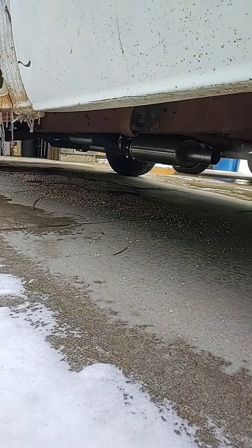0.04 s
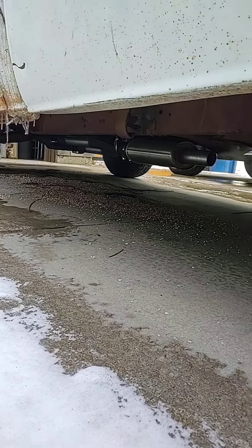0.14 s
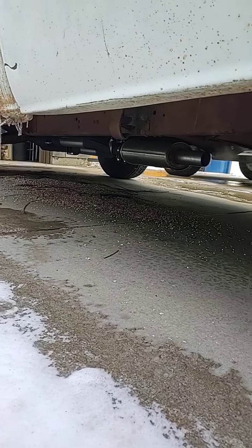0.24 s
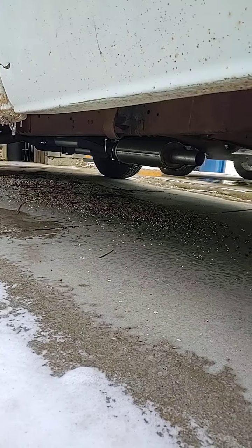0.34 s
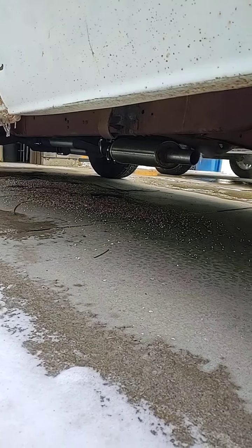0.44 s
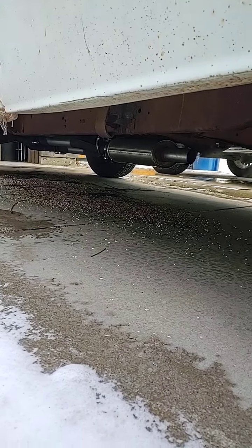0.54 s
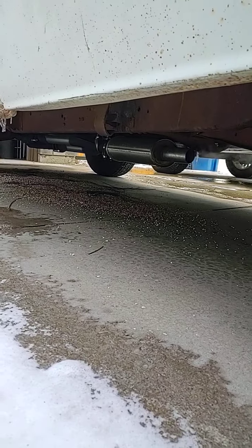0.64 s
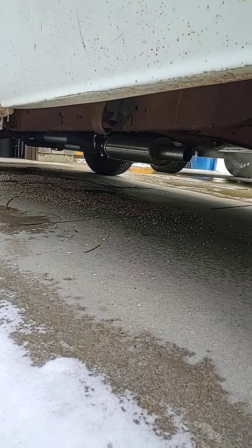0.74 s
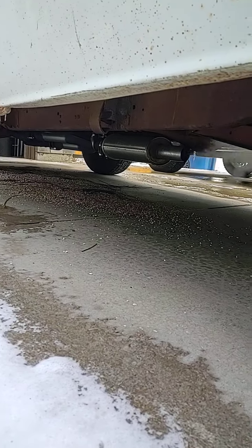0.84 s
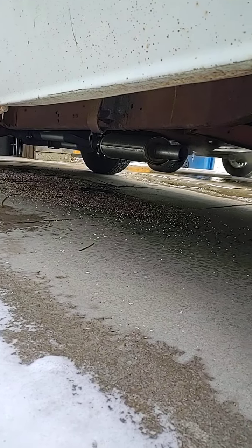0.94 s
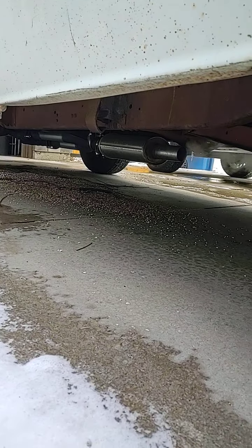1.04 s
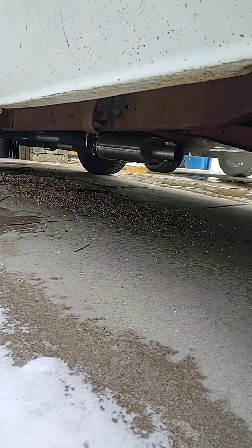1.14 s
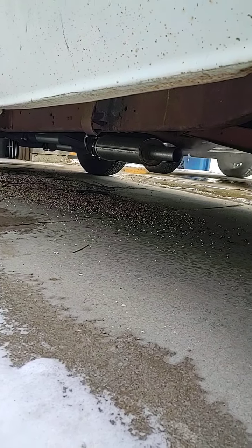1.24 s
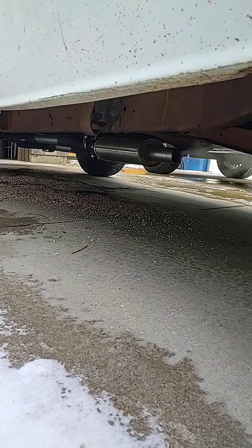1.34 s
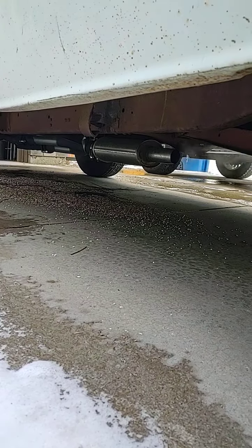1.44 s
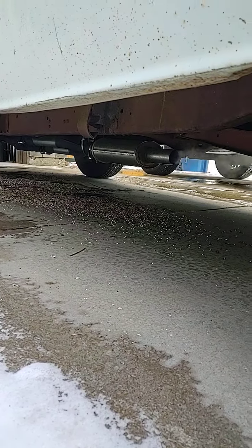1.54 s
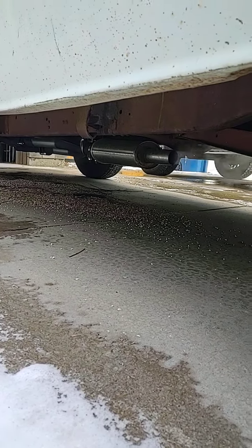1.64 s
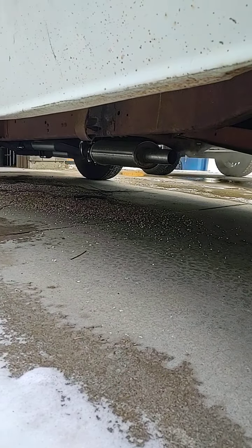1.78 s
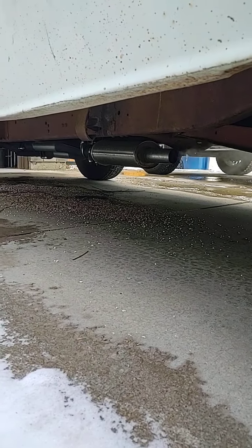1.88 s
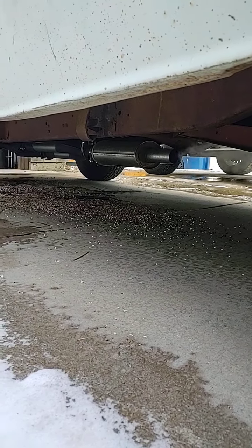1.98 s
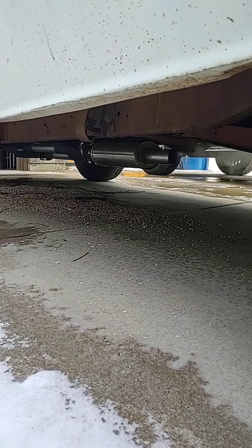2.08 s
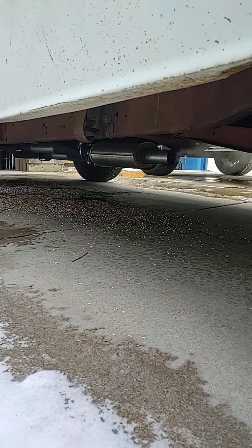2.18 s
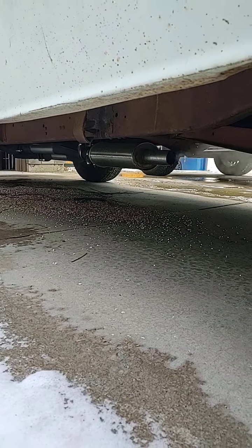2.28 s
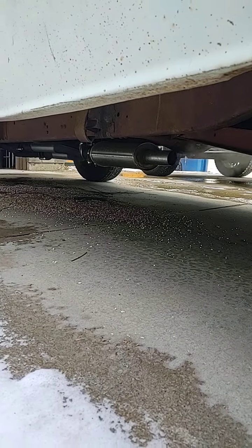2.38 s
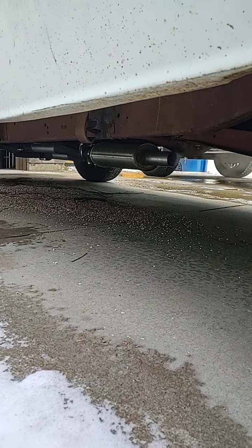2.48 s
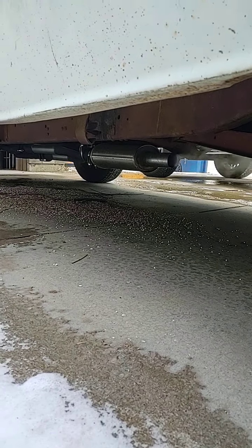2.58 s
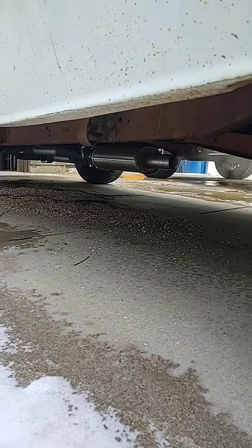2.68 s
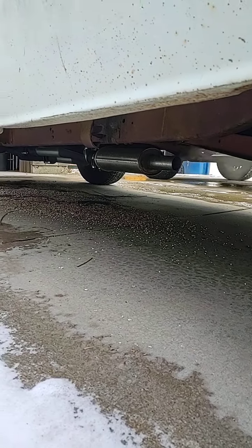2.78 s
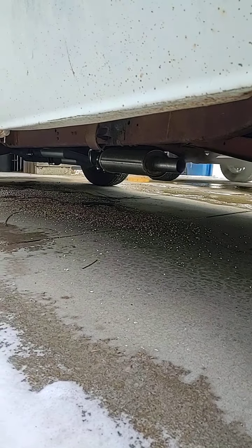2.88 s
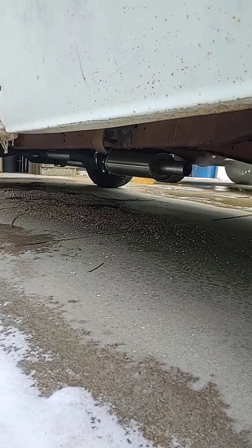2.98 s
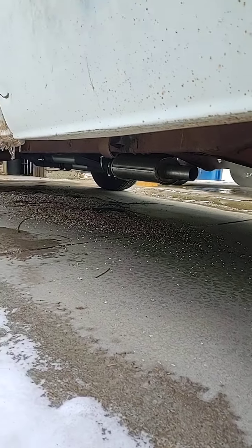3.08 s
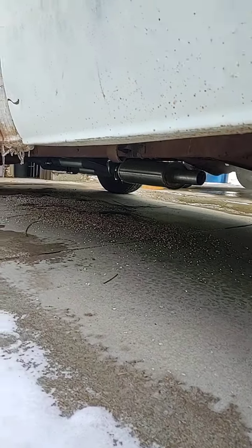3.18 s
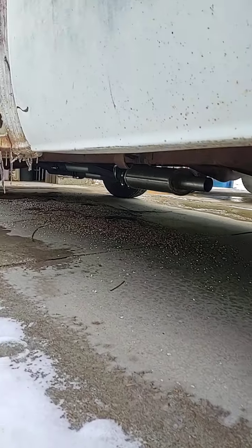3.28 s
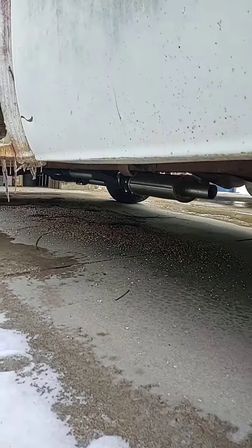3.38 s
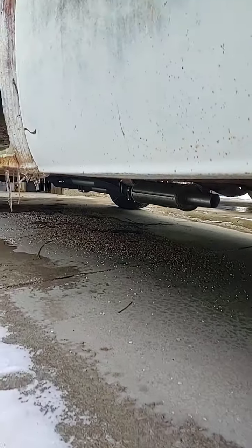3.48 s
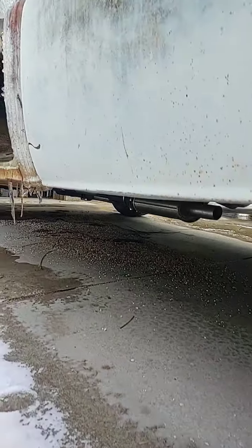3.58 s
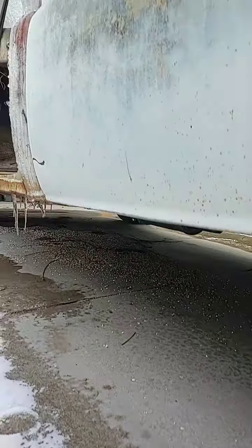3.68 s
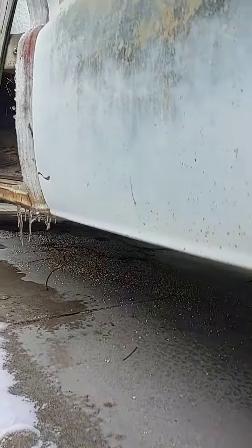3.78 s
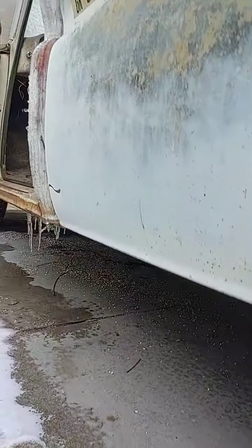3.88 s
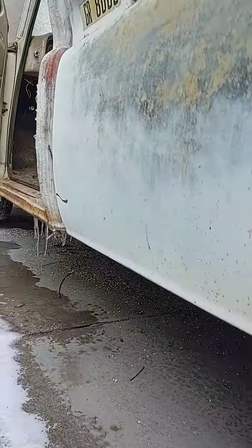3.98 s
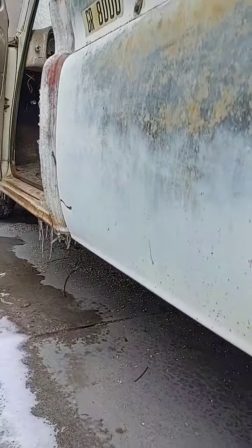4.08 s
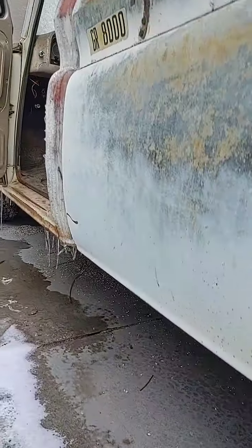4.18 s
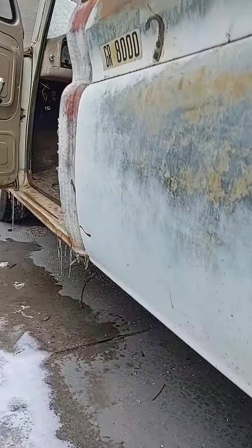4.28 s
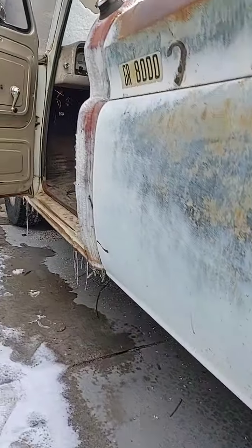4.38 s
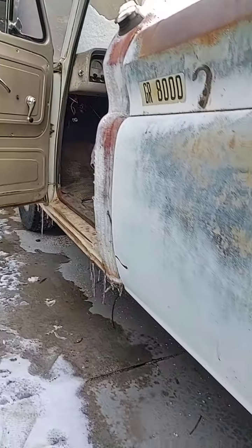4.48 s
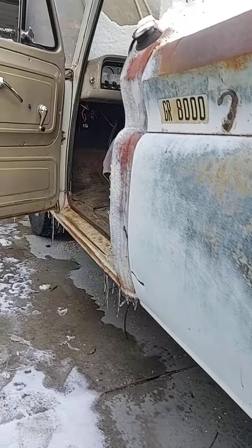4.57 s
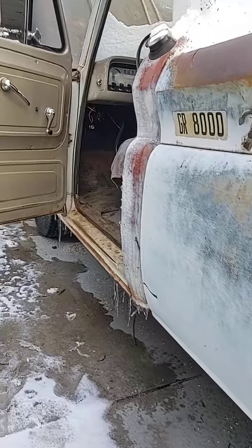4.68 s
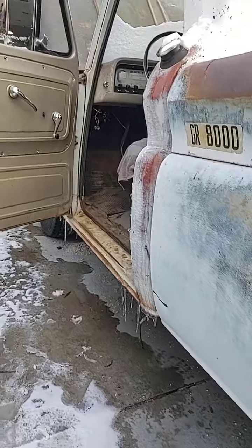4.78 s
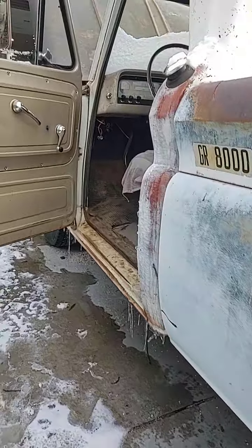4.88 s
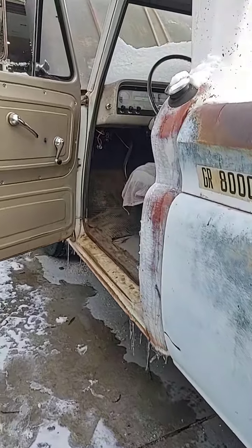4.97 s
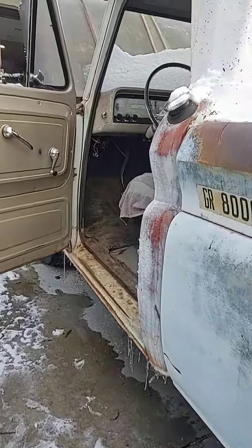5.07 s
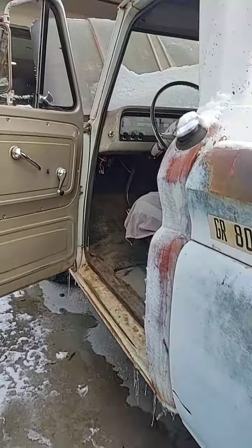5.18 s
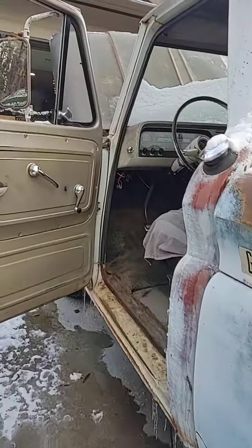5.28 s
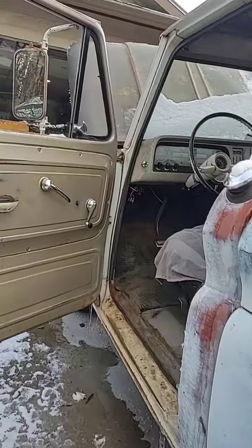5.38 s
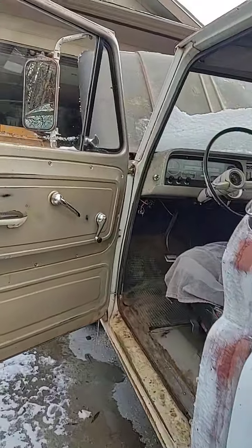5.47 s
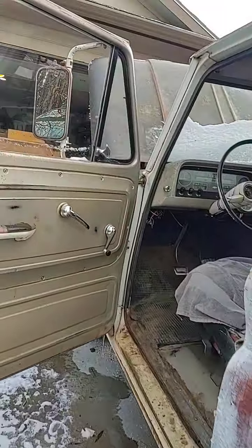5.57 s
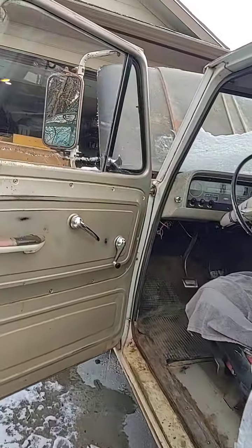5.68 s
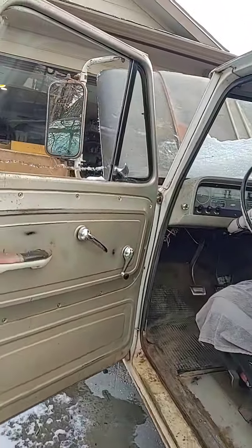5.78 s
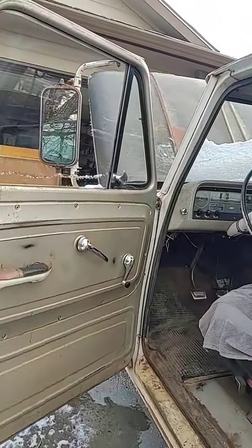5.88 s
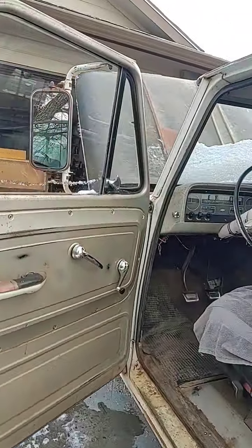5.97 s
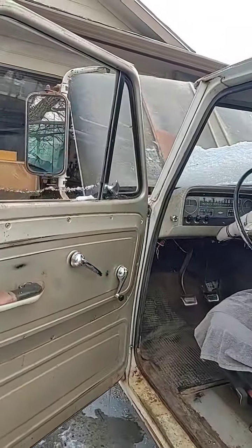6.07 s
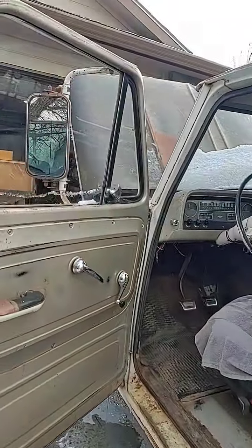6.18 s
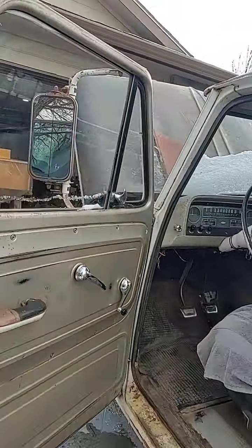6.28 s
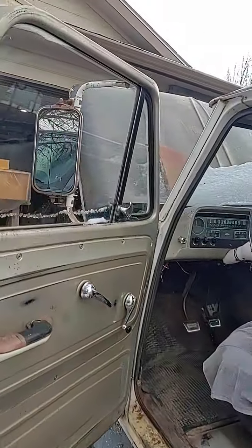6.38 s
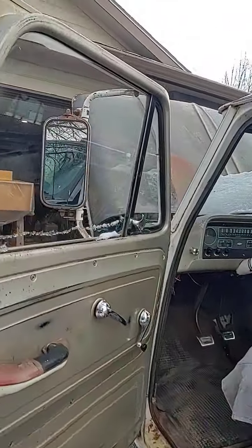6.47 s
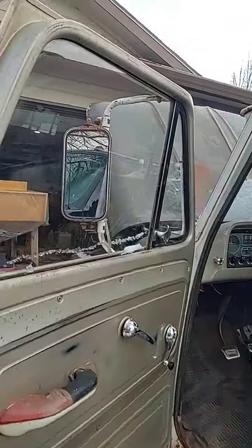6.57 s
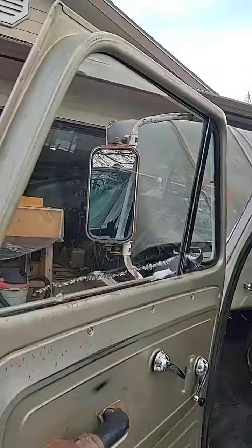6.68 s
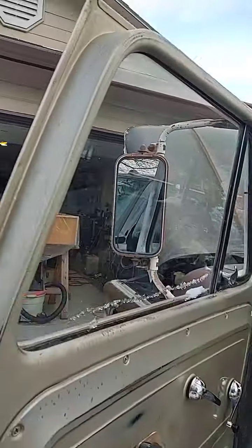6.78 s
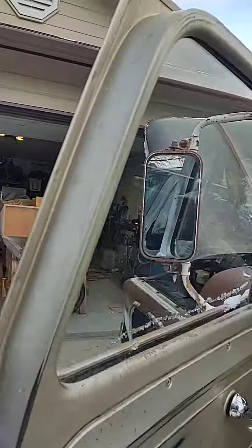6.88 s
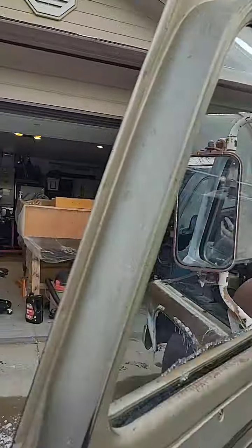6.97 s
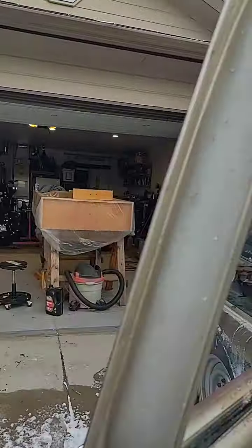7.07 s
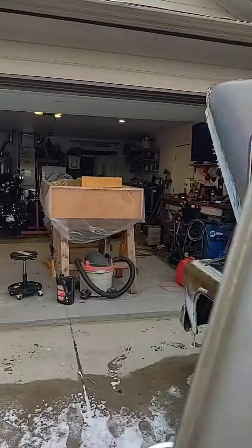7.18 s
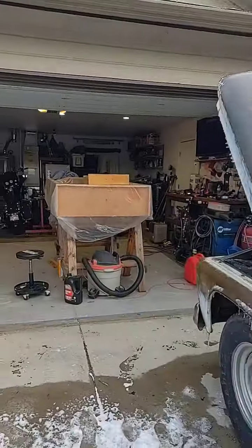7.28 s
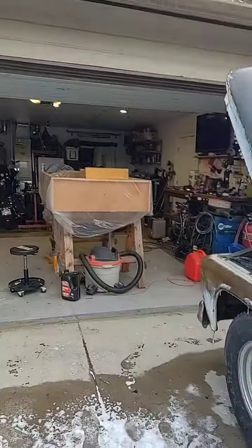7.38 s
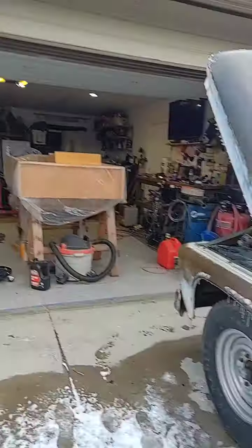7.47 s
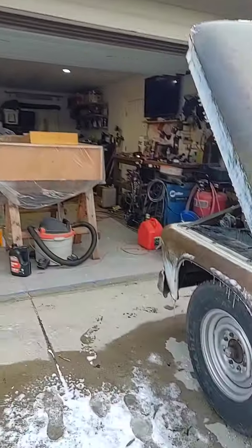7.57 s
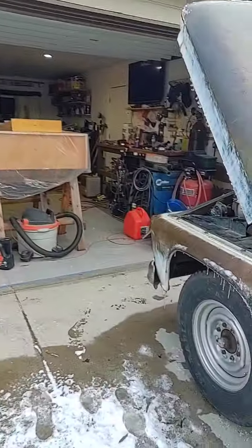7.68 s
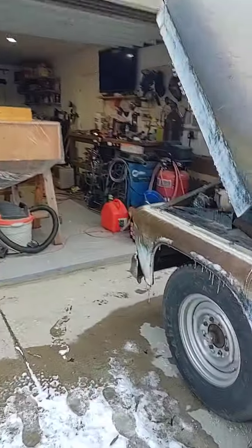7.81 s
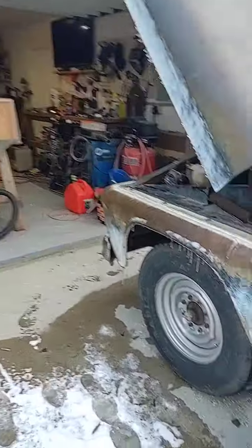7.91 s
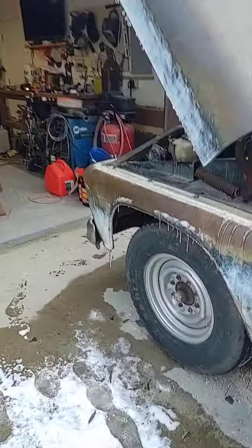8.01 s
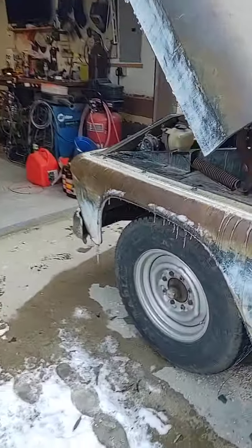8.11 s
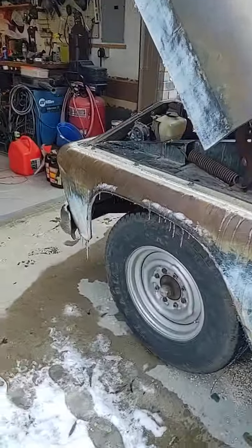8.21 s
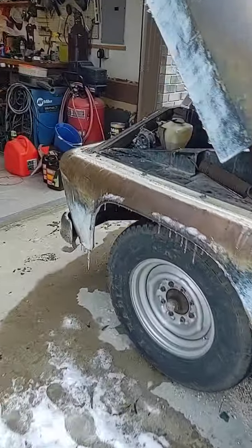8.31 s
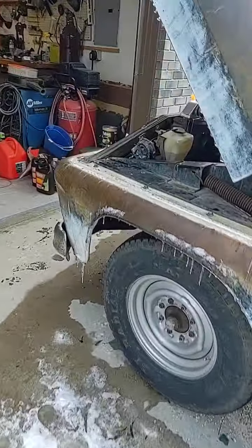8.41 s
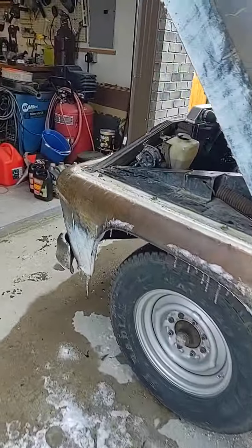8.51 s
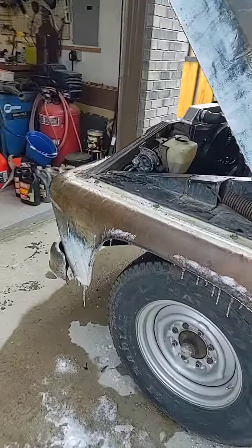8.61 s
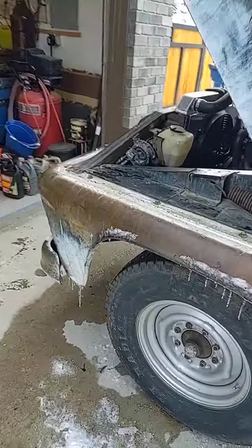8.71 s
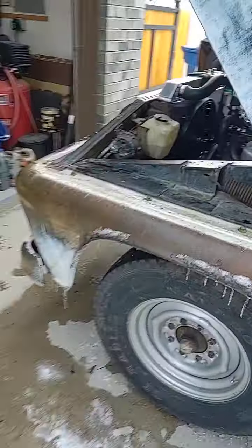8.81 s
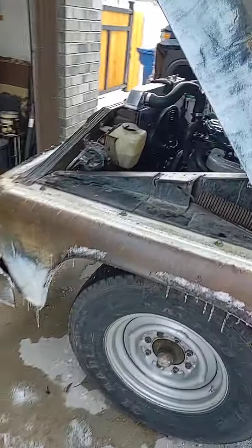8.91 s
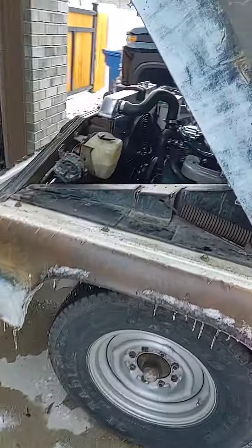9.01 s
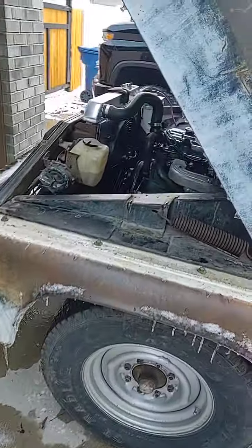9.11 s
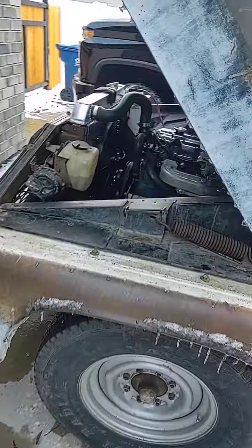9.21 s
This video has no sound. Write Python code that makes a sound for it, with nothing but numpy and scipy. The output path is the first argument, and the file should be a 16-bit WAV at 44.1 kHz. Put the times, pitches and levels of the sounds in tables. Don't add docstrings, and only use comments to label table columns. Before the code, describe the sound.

Rapid ragged exhaust chuffs from a rough six-cylinder idle recede behind the truck's body, giving way to deep throb, engine-bay hiss and airy intake whistle.

```python
import sys
import numpy as np
from scipy import signal
from scipy.fft import rfft, irfft, next_fast_len
from scipy.io import wavfile
from scipy.ndimage import uniform_filter1d, map_coordinates

SR = 44100
rng = np.random.default_rng(int(sys.argv[2]) if len(sys.argv) > 2 else 0)


def amp(db):
    return 10 ** (np.asarray(db, float) / 20)


def write(x):
    x = np.atleast_2d(x).T
    wavfile.write(sys.argv[1], SR, np.round(np.clip(x, -1, 1) * 32767).astype(np.int16))


N = 407925
FIRING_PERIOD_S = 0.051

# (time [s], firing rate [1/s])
IDLE_RATE = [
    (7.0, 16),
    (7.39, 19),
    (7.68, 22),
    (8.52, 20.3),
    (8.94, 21.0),
    (9.25, 16.6),
]
# (frequency [Hz], width [Hz], front over rear manifold [dB], lag [s])
PIPE_MODES = [(46, 24, -16, .030), (61, 22, 8, .001), (76, 28, 8, .039), (99, 20, 6, .01),
              (120, 28, -8, .02)]
# (rest level [dB], share of surge, share of stumble,
# loss with distance [dB/m], surge share gained with distance [1/m])
MODE_RESPONSE = [(-32, -0.75, 0.52, 5, 0.14), (-40, 1.02, 1.8, 4, -0.085), (-40, 0.2, -0.75, 3, 0.33),
                 (-41, -0.055, 0.2, 3, -0.0018), (-41.5, 0.7, 1.4, 4, 0.13)]
# (time [s], place [0 pipe in view, 1 beside bed, 2 behind door], sheen over 13 kHz [dB],
# distance walked [m], air over 8 kHz [dB])
WALK = [
    (0, 0.053, 0, 0.5, -18),
    (2.2, 0.0088, 1.5, 0, -18.5),
    (2.7, 0.066, 8.5, 0.27, -22),
    (3.3, 0.056, 7, 0.06, -21.5),
    (3.702, 0.19, 5, 0.36, -22.5),
    (4.2, 0.69, 1, 0.87, -13.5),
    (5.1, 1.82, 5, 1.14, -10),
    (5.4, 2.12, 2, 1.48, -17.5),
    (9.25, 1.8, -1, 3.5, -1),
]
# (time [s], openness [0-1])
HOOD_VIEW = [(6.5, 0), (7.2, 0.1), (7.56, 0.48), (8.0, 0.7), (8.6, 0.69), (8.85, 1), (9.25, 0.93)]
# (frequency [Hz], density [dB/Hz])
JET_IN_VIEW = [(880, -57), (1500, -38), (2460, -28), (2840, -1), (3130, -15.5), (3370, -0.5), (4190, -0.5),
               (5490, 2.5), (6820, -8.5), (9000, -13.5), (11700, -22), (19800, -120)]
# (frequency [Hz], density [dB/Hz])
JET_BESIDE_BED = [(1000, -19), (1700, -15.5), (1960, -5), (2390, -10), (2960, -0.5), (4410, -10.5),
                  (5690, 4.5), (7540, -11.5), (9650, -9), (10500, -16), (11700, -1.5), (13000, -48)]
# (frequency [Hz], density [dB/Hz])
JET_BEHIND_DOOR = [(1000, -14), (1700, -5), (2340, -14), (2550, -22), (3710, -1), (6620, -1.5), (7510, -14),
                   (9000, -2.5), (11700, -13), (19800, -120)]
# (frequency [Hz], density [dB/Hz])
JET_AIR = [(4410, -31), (7500, -2), (8350, 6), (8690, -9), (9320, 5), (10700, -10), (11700, -1),
           (14400, -3), (15600, -4.5)]
# (frequency [Hz], density [dB/Hz])
BLOCK_AT_BED = [(88, -5), (150, -0.5), (189, -9.5), (237, -7), (270, -19.5), (330, -17.5), (512, -14.5),
                (651, -4.5), (950, -19.5), (1240, -51), (2090, -120)]
# (frequency [Hz], density [dB/Hz])
BLOCK_AT_HOOD = [(88, -11), (150, 5), (189, -9.5), (248, -3), (382, -23), (512, -14.5), (575, -6),
                 (759, -4.5), (886, -11.5), (950, -11), (1240, -48), (2090, -120)]
# (frequency [Hz], density [dB/Hz])
VALVE_GEAR = [(500, -1.5), (850, -8.5), (1010, -1.5), (1220, -5), (1390, 0), (1710, -6.5), (1960, 0),
              (2800, -6), (3640, -19), (6160, -120)]
# (frequency [Hz], density [dB/Hz])
FAN = [(880, -47), (1500, -15.5), (2130, -9), (2350, -4), (2570, -30), (3350, -24), (3800, -12),
       (4910, -16.5), (6210, -10), (8670, -11.5), (9460, -16), (12200, -15.5), (14000, -10.5), (15600, -15)]
# (frequency [Hz], density [dB/Hz])
MUFFLER = [(200, -27), (300, -8.5), (345, -2.5), (400, -6.5), (550, -26), (900, -120)]
# (frequency [Hz], left-right likeness [0-1])
DIFFUSE = [(60, 1), (290, 0.98), (640, 1), (1400, 0.26), (16000, 0.051)]
# (frequency [Hz], lead of the left port [rad])
TAILPIPE_LEAD = [(0, -17), (950, 1.1), (2670, -5.5), (3010, -3), (3530, -8.5), (3880, -8), (4310, -14.5),
                 (5250, -13.5), (6030, -12.5), (6720, -14), (7670, -11), (10500, -7), (14300, -3),
                 (16200, -19)]
# (frequency [Hz], left over right [dB])
PORT_COLOUR = [(100, 0.14), (700, 0.8), (1300, -1.5), (1900, -10), (2600, -12), (3300, -11), (4400, -2.5),
               (6000, 7), (8100, -.5), (11000, -4.5), (15000, -2.5)]
# (frequency [Hz], width [Hz], level [dB])
CHASSIS_MODES = [(2340, 40, -7), (2910, 60, 17), (3360, 53, -14), (3760, 130, 0), (3960, 310, 4),
                 (4190, 69, -10), (5560, 340, -20)]
# (time [s], peak level [dB], frequency [Hz], decay time t60 [s])
KNOCKS = [(0.029, -34, 646, 0.067), (0.643, -33, 624, 0.09), (1.26, -34.5, 343, 0.12),
          (1.278, -30, 640, 0.081), (1.589, -25.5, 664, 0.044), (2.202, -29.5, 635, 0.076),
          (4.035, -32, 640, 0.066), (5.809, -34.5, 723, 0.041), (5.872, -39, 238, 0.043),
          (6.167, -39, 648, 0.15), (6.977, -42, 753, 0.073), (7.328, -42, 303, 0.061),
          (7.448, -35, 435, 0.05), (7.788, -43, 202, 0.065), (8.142, -31.5, 347, 0.033),
          (8.808, -39, 233, 0.12), (8.909, -37, 390, 0.059)]
# (time [s], peak level [dB])
FULL_CHARGES = [(.0263, -4), (.1246, -6), (.174, -4), (.2733, -3), (.4863, -5), (.5923, -3.5), (.7487, -7),
                (.911, -6.5), (1.0767, -8), (1.2332, -3), (1.5335, -6.5), (1.8385, -3), (1.995, -4.5),
                (2.0527, -6.5), (2.2062, -3.5), (2.46, -6.5), (2.8197, -5.5), (2.9178, -6.5), (3.0704, -7),
                (3.4184, -8), (3.9334, -17), (4.3034, -19), (4.5252, -24), (4.8244, -24), (5.109, -30.5),
                (5.574, -30), (6.1653, -27.5), (6.3715, -31.5), (6.786, -30.5), (7.4053, -44.5)]
# (time [s], peak level [dB])
LEAN_CHARGES = [(0.0778, -9.5), (.3277, -18.5), (0.4306, -12), (0.81, -20), (0.969, -21), (1.1313, -13.5),
                (1.4303, -17.5), (1.637, -12.5), (1.741, -9.5), (1.942, -13), (2.515, -19), (2.97, -21.5),
                (3.1762, -15), (3.6174, -18), (3.7186, -20), (4.0893, -24.5), (4.2455, -29.5),
                (4.4673, -33), (4.773, -29.5), (5.058, -30), (5.259, -40), (5.314, -41.5), (5.519, -41),
                (5.6753, -35), (5.9646, -34), (6.0157, -43), (6.32, -35.5), (6.425, -40), (6.634, -39.5),
                (6.835, -48)]
# (time [s], half length [s], level [dB])
SURGES = [(0.215, .25, 16.5), (0.833, 0.06, 8.5), (1.114, 0.091, -7.5), (1.57, 0.47, 11.5),
          (2.38, 0.17, 7.5), (2.896, 0.15, 13), (3.468, 0.26, 10.5), (4.127, 0.034, 8), (4.4, 0.058, -13.5),
          (4.9, 0.23, 8), (5.926, 0.38, 6.5), (6.896, 0.14, 4.5), (7.778, 0.22, 9), (8.95, 0.17, 9.5)]


def unit(x):
    return x / np.sqrt(np.mean(x ** 2) + 1e-20)


def along(points, hz):
    f, v = np.transpose(points)
    return np.interp(np.log(hz + 1), np.log(f + 1), v)


def curves(rows):
    s, *columns = np.transpose(rows)
    return [np.interp(np.arange(N) / SR, s, column) for column in columns]


def filtered(x, response):
    m = next_fast_len(N + SR // 2)
    return irfft(rfft(x, m) * response(np.fft.rfftfreq(m, 1 / SR)), m)[..., :N]


def wobble(rate):
    knots = rng.standard_normal(int(N * rate / SR) + 4)
    return map_coordinates(knots, [np.arange(N) * rate / SR])


def mottle(shape, wide, long):
    field = uniform_filter1d(rng.standard_normal(shape), size=wide, axis=0)
    return unit(uniform_filter1d(field, size=long, axis=1))


def side_lead(hz):
    return -2 * np.pi * 0.00018 * hz


def split_phase(x, lead):
    return filtered(x, lambda hz: np.exp(.5j * np.outer([1, -1], lead(hz))))


def turbulence(spectrum, alike, patchy_db, drift_db=0, lead=side_lead):
    z = signal.stft(rng.standard_normal((2, N)), nperseg=512)[2]
    patches_db = patchy_db * mottle(z.shape[1:], wide=3, long=7)
    drifts_db = drift_db * mottle(z.shape[1:], wide=6, long=120)
    pair = signal.istft(z * amp(patches_db + drifts_db), nperseg=512)[1][:, :N]

    def mid_side(hz):
        angle = np.arccos(np.clip(along(alike, hz), -1, 1)) / 2
        return amp(along(spectrum, hz)) * [np.cos(angle), np.sin(angle)]

    mid, side = filtered(pair, mid_side)
    return unit(split_phase(np.array([mid + side, mid - side]), lead))


def hunting():
    t = np.arange(0, N, 64) / SR
    swells = np.array([db * np.exp(-((t - s) / half) ** 2) for s, half, db in SURGES])
    parts = swells.clip(0), swells.clip(None, 0)
    return [np.interp(np.arange(N) / SR, t, part.sum(0)) for part in parts]


def engine_bay():
    view, = curves(HOOD_VIEW)
    surge_db = hunting()[0]
    hiss_db = -55.5 + 12.8 * np.sqrt(np.abs(view))
    whistle_db = -62 + 23 * view + view * (0.13 * surge_db + 1 * wobble(9))
    flutter = filtered(rng.standard_normal((2, N)), lambda f: 1 / (1 + (f / 85) ** 2))
    phase = 2 * np.pi * np.cumsum(2370 + 12 * wobble(3)) / SR
    whistle = unit(flutter[0] * np.cos(phase) + flutter[1] * np.sin(phase))
    hiss = turbulence(FAN, DIFFUSE, patchy_db=2.1, drift_db=0.2, lead=lambda hz: 0 * hz)
    return amp(hiss_db + 1.5) * hiss + amp(whistle_db - 6.0) * whistle


def engine_block():
    place, _, walked, _ = curves(WALK)
    view, = curves(HOOD_VIEW)
    t = np.arange(N) / SR
    rumble_db = -45 - 3.84 * walked + 6.7 * view
    gear_db = -51.5 - 3.33 * walked + 10.7 * view
    hum_db = np.maximum(-41.5 - 3.5 * t - 25 * place, -63)
    ahead = np.clip((t - 5.6) / 1.15, 0, 1)
    rumble = np.sqrt(1 - ahead) * turbulence(BLOCK_AT_BED, DIFFUSE, patchy_db=2.5)
    rumble = rumble + np.sqrt(ahead) * turbulence(BLOCK_AT_HOOD, DIFFUSE, patchy_db=2.5)
    hum = turbulence(MUFFLER, DIFFUSE, patchy_db=2.5)
    gear = turbulence(VALVE_GEAR, DIFFUSE, patchy_db=2.0)
    return amp(rumble_db + 3) * rumble + amp(hum_db - 1.5) * hum + amp(gear_db + 7) * gear


def pops_and_footfalls():
    sound, t = np.zeros(N + SR), np.arange(SR // 5) / SR
    for s, db, hz, t60 in KNOCKS:
        onset = 1 - np.exp(-t / 0.0023)
        ring = amp(db + 3.0 - 60 * t / t60) * onset * np.sin(2 * np.pi * hz * t)
        scuff = np.convolve(rng.standard_normal(len(t)), np.hanning(60) / 5, 'same')
        sound[round(s * SR):][:len(t)] += ring + amp(db - 7 - 60 * t / 0.019) * scuff
    return sound[:N]


def charges():
    s, db = np.transpose(sorted(FULL_CHARGES + LEAN_CHARGES))
    turns = np.cumsum(np.round(np.diff(s, prepend=s[0]) / FIRING_PERIOD_S)).astype(int)
    count = np.arange(turns[-1] + 1)
    times = np.interp(count, turns, s)
    usual_db = np.interp(times, *np.transpose(FULL_CHARGES)) - 3
    lack_db = np.zeros(len(count))
    lack_db[turns] = np.minimum(db - usual_db[turns], 0)
    chance = rng.standard_normal((len(count), 2))
    front = (-1.) ** count / 2
    carried_db = 0.39 * np.roll(lack_db, 1)
    peak_db = usual_db - 0.34 * front + 0.8 * chance[:, 0] + carried_db
    peak_db[turns] = db
    air_db = np.interp(times, *np.transpose(WALK)[[0, 4]])
    return times, peak_db, air_db + 6.5 * front + 2 * chance[:, 1]


def firings(early):
    count = np.cumsum(curves(IDLE_RATE)[0]) / SR
    turns = count[round(early[-1] * SR)] + np.arange(1, 60)
    steady = np.interp(turns, count, np.arange(N) / SR, right=np.inf)
    before = early[0] - FIRING_PERIOD_S * np.array([3, 2, 1])
    return np.concatenate([before, early, steady[steady < N / SR]])


def exhaust_pipe(early):
    times = firings(early)
    surge_db, stumble_db = hunting()
    walked = curves(WALK)[2]
    times[1:-1] = (times[:-2] + 2 * times[1:-1] + times[2:]) / 4
    front = (-1.) ** np.arange(1, len(times) + 1) / 2
    span = next_fast_len(N + SR // 2)
    sound = np.zeros(N)
    for (hz, width, lean_db, lag), (rest_db, share, trip, loss, gain) in zip(PIPE_MODES, MODE_RESPONSE):
        level_db = rest_db - loss * walked + (share + gain * walked) * surge_db + trip * stumble_db
        at = np.round((times - .030 + lag) * SR).astype(int)
        size_db = lean_db * front + 1.5 * rng.standard_normal(len(times))
        blows = np.bincount(at % span, amp(size_db), span)
        mode = lambda f: (1j * f * width / (hz * hz - f * f + 1j * f * width)) ** 2
        sound += amp(level_db) * unit(filtered(blows, mode))
    boom = filtered(sound, lambda f: (1j * f / (30 + 1j * f)) ** 6 / (1 + 1j * f / 160) ** 2) * amp(6)
    return split_phase(boom, side_lead)


def puff_envelope(times, peaks_db, rise, fall, linger, linger_db):
    t = np.arange(-SR // 50, SR // 6) / SR
    after = amp(-60 * t / fall) ** 2 + amp(linger_db - 60 * t / linger) ** 2
    shape = 1 / (1 / after + amp(-60 * t / rise) ** 2)
    times = np.append(times, times[0] - FIRING_PERIOD_S)
    peaks_db = np.append(peaks_db, peaks_db[1])
    starts = np.zeros(N + SR // 10)
    starts[np.round((times + .001) * SR).astype(int) + SR // 10] = amp(peaks_db) ** 2
    power = signal.fftconvolve(starts, shape / shape.max())[SR // 50 + SR // 10:][:N]
    return np.sqrt(np.abs(power))


def underbody(x, t60):
    t = np.arange(SR // 6) / SR
    paths = rng.standard_normal((2, len(t))) + 0.84 * rng.standard_normal(len(t))
    paths = paths * amp(-60 * t / t60) * np.clip(t / 0.006, 0, 1)
    return signal.fftconvolve(x, paths / np.linalg.norm(paths[0]), axes=1)[:, :N]


def chassis_resonance(f):
    return 1 + 0.85 * sum(amp(db / 2) / (1 + (2 * (f - c) / w) ** 2) for c, w, db in CHASSIS_MODES)


def tailpipe_jets(times, peak_db, air_db):
    place, sheen_db, *_ = curves(WALK)
    in_view, at_bed, at_door = [np.sqrt(np.clip(1 - abs(place - k), 0, 1)) for k in range(3)]
    lead = lambda hz: along(TAILPIPE_LEAD, hz)
    seen = turbulence(JET_IN_VIEW, [(2000, 1.0), (8000, 0.51)], patchy_db=3.5, drift_db=3.0, lead=lead)
    seen = unit(filtered(seen, chassis_resonance))
    beside = turbulence(JET_BESIDE_BED, [(2000, 0.29)], patchy_db=3.5, drift_db=1.5, lead=lead)
    hidden = turbulence(JET_BEHIND_DOOR, [(2000, 0.24)], patchy_db=2.5, drift_db=1.0, lead=lead)
    air = turbulence(JET_AIR, [(8000, 0.55)], patchy_db=2.5, drift_db=.8, lead=lead)
    sheen = filtered(air, lambda f: 1 / (1 + (12800 / (f + 1)) ** 16))
    air = air + (amp(sheen_db) - 1) * sheen

    direct = puff_envelope(times, peak_db - 8.5, rise=0.021, fall=0.066, linger=0.15, linger_db=-8)
    echoed = amp(-8.5) * puff_envelope(times, peak_db, rise=0.024, fall=0.08, linger=0.18, linger_db=-8)
    brief = puff_envelope(times, peak_db + air_db + 4.5, rise=0.016, fall=0.046, linger=0.13, linger_db=-12.0)
    jet = direct * in_view * seen + echoed * (at_bed * beside + at_door * hidden)
    jet = jet * amp(1.16 * wobble(300) + 2.17 * wobble(1400))
    return jet + amp(-9) * underbody(jet, t60=.13) + brief * air


def scene():
    times, peak_db, air_db = charges()
    background = engine_bay() + engine_block() + pops_and_footfalls()
    return background + exhaust_pipe(times) + tailpipe_jets(times, peak_db, air_db)


def roll_off(x):
    return signal.sosfilt(signal.butter(12, 16650, fs=SR, output="sos"), x)


def record(dry):
    colour = lambda hz: amp(np.outer([.5, -.5], along(PORT_COLOUR, hz))) * (hz < 15900)
    ports = np.clip(filtered(dry, colour), -1, 1)
    return roll_off(ports)


dry = scene()
out = record(dry)
write(out)
```